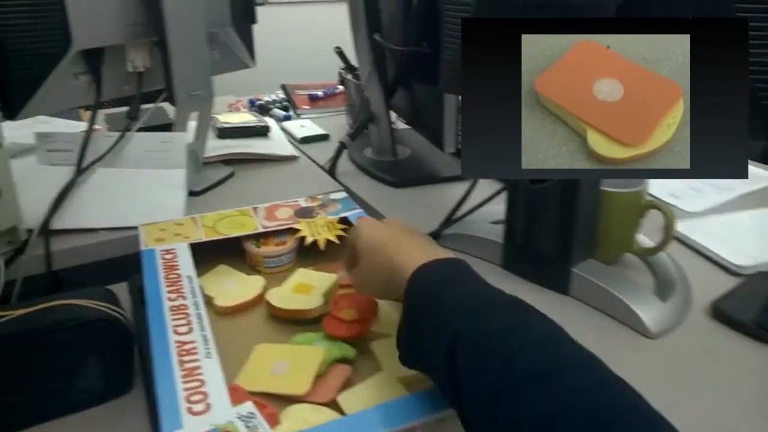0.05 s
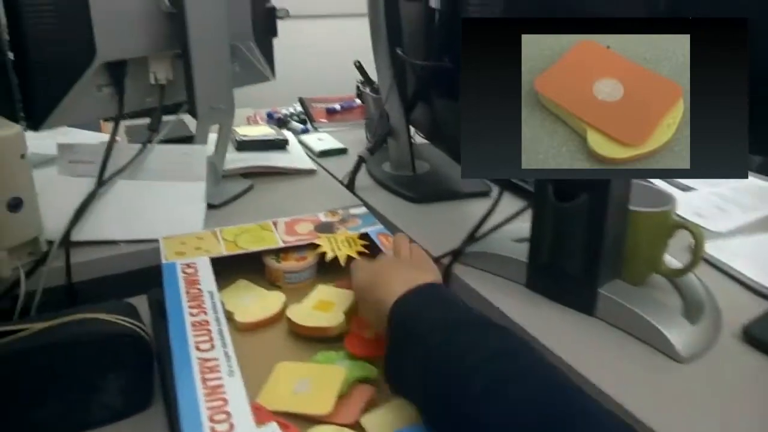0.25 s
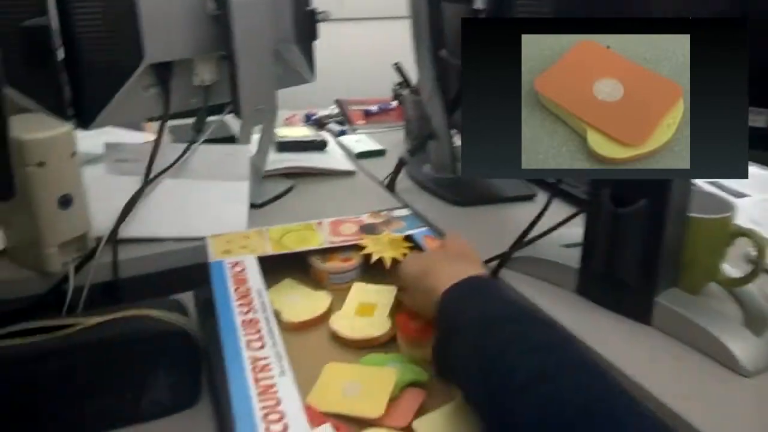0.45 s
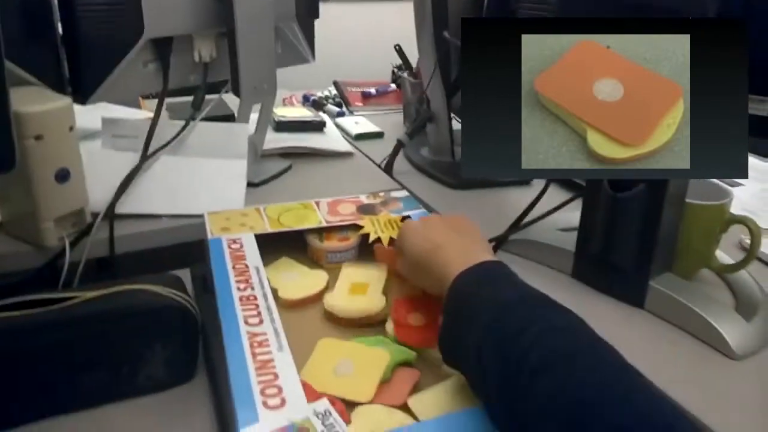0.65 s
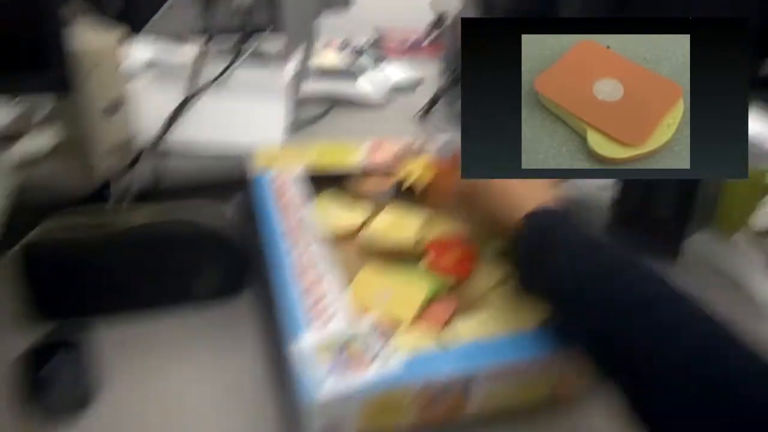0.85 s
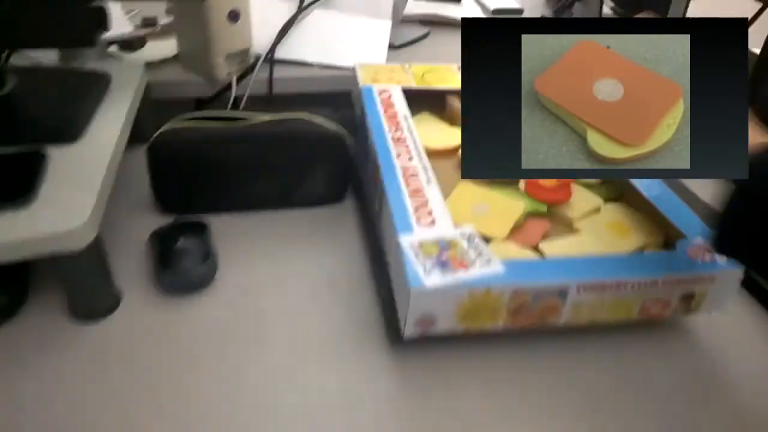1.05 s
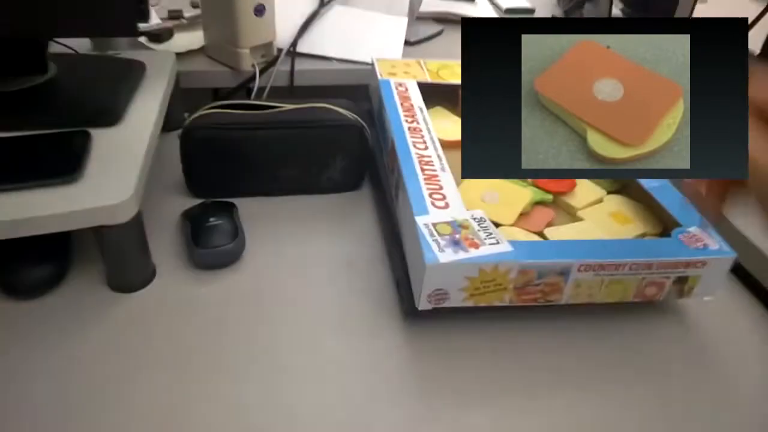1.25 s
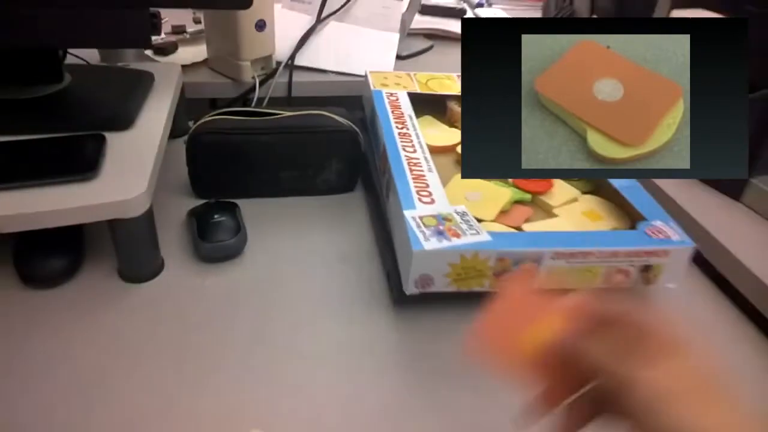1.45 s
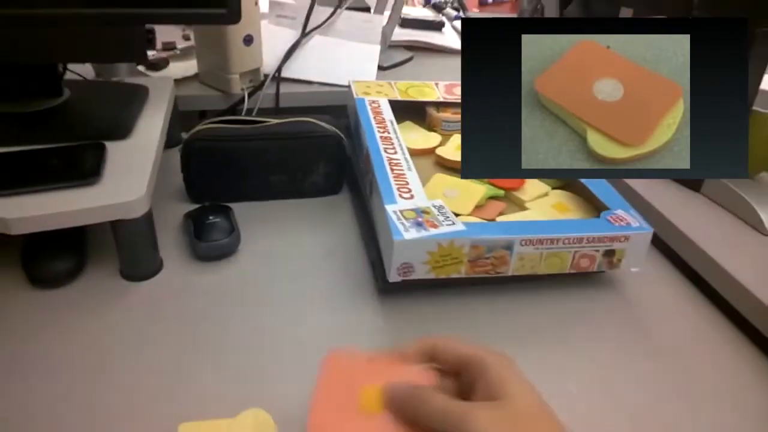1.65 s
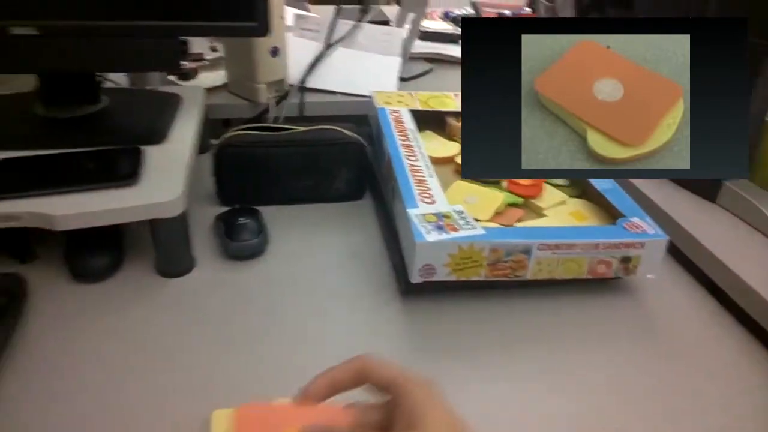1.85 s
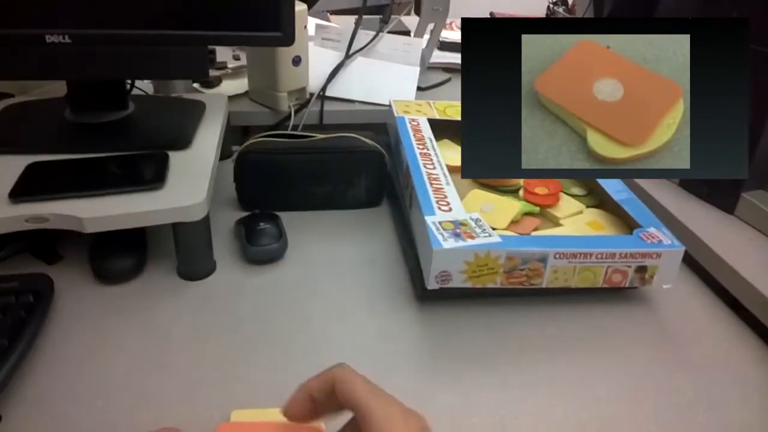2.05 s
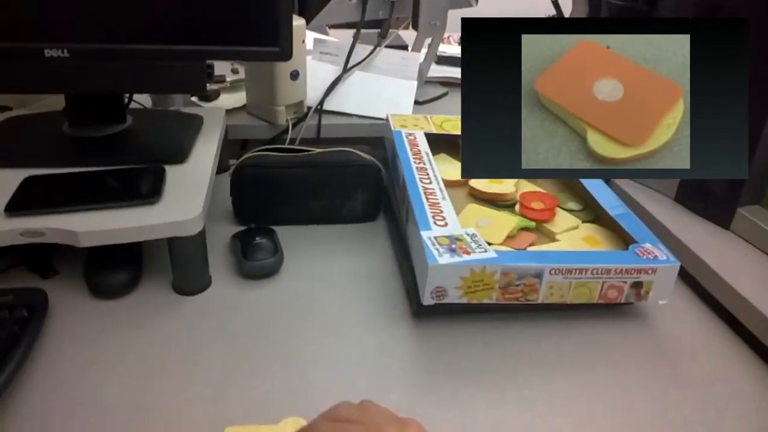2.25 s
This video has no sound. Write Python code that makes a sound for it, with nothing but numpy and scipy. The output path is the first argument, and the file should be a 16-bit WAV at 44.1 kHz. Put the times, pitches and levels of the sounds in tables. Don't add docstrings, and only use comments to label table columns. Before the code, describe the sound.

A short, bright rattle of plastic toy pieces being rummaged in a box, then near quiet

```python
import sys
import numpy as np
from scipy import signal
from scipy.io import wavfile
from scipy.ndimage import uniform_filter1d

SR = 44100
rng = np.random.default_rng(int(sys.argv[2]) if len(sys.argv) > 2 else 0)


def volts_from_decibels(level):
    exponent = np.asarray(level, float) / 20
    return 10 ** exponent


def unload_wav(signal):
    wavfile.write(
        sys.argv[1],
        SR,
        np.round(np.clip(np.atleast_2d(signal).T, -1, 1) * 32767).astype(np.int16),
    )


N = 101429

# frequency in Hz, level in dB, time to fade by 60 dB in seconds.
LARGE_PIECE = [(1075, 4, 0.088), (1173, -2.5, 0.074), (1190, -11, 0.088), (1195, -1, 0.06),
               (1275, -7.5, 0.052), (1390, -10, 0.084), (1660, -16, 0.024), (1820, -11, 0.03),
               (1904, -17, 0.051), (2223.5, -7, 0.065), (2316, -16.5, 0.035), (2450, -13, 0.035),
               (2715, -16.5, 0.04), (3000, -22.5, .02)]
# frequency in Hz, level in dB, time to fade by 60 dB in seconds.
SMALL_PIECE = [(999, -9.5, 0.018), (1058, 1.5, 0.084), (1240, -3.5, 0.034), (1375, 9.5, 0.009),
               (1578.5, 3, 0.017), (2040, -1, 0.034), (2230, -19.5, 0.026), (2470, -19.5, .025)]


def evened(x):
    return x / np.sqrt(np.mean(x ** 2) + 1e-20)


def low(x, hz, order=2):
    return signal.sosfilt(signal.butter(order, hz, fs=SR, output="sos"), x)


def add(mix, s, sound):
    part = mix[round(s * SR):][:len(sound)]
    part += sound[:len(part)]


def contacts(length, size=1500):
    u = np.arange(size) / SR / max(length, .0005)
    grit_db = 4.5
    grit = rng.standard_normal(size) * volts_from_decibels(grit_db * rng.standard_normal(size))
    rise = np.minimum(u / 0.079, 1)
    return grit * rise * np.exp(-2 * u ** 2)


def ring(modes, from_hz, size=5000):
    spread_db, detune, longest_t60 = 4, 0.011, .055
    t = np.arange(size) / SR
    hz, db, t60 = np.transpose(modes)[:, :, None]
    weight, tune = rng.standard_normal((2, len(modes), 1))
    fading_db = db + spread_db * weight - 60 * t / np.clip(t60, .001, longest_t60)
    tones = volts_from_decibels(fading_db) * np.sin(2 * np.pi * hz * (1 + detune * tune) * t)
    bass_cut = signal.butter(4, from_hz, "high", fs=SR, output="sos")
    return signal.sosfilt(bass_cut, tones.sum(0))


def as_modes(peaks):
    return [(hz, db + 20 * np.log10(width / 500), 1.8 / width) for hz, width, db in peaks]


def bodies(piece, spot_hz=4300, top_hz=12500):
    # frequency in Hz, width in Hz, level in dB.
    crack_peaks = [(4000, 150, -10), (4250, 110, 0.5), (4767, 180, -5.5), (5100, 260, -4), (5710, 1300, -2),
                   (6590, 300, -2.5), (7220, 350, -1.5), (7910, 250, -5), (8290, 280, -6.5),
                   (9230, 540, -5), (10190, 260, -7.5), (11600, 700, -19.5), (12700, 900, -21),
                   (14000, 900, -27)]
    # frequency in Hz, width in Hz, level in dB.
    box_peaks = [(410, 230, 1), (587, 100, 3.5), (675, 220, 7), (720, 150, -2)]
    bright_spot = (spot_hz, 260, 6.5)  # Hz, width Hz, dB
    piece_ring = low(ring(piece, 1220), 2780)
    crack = low(ring(as_modes([*crack_peaks, bright_spot]), 3700), top_hz)
    box = low(ring(as_modes(box_peaks), 330), 2780)
    return piece_ring, crack, box


def peaked(drive, body, db):
    out = signal.fftconvolve(drive, body)
    loudest = uniform_filter1d(out ** 2, size=88).max()
    return volts_from_decibels(db) * out / np.sqrt(2 * loudest)


def knock(piece, s, db, crack_db, spot_hz, length):
    drive = contacts(length)
    top_hz = max(12500 + 294.5 * (db + 11.5), 2.1 * spot_hz)
    levels = (db, crack_db, db - 19)
    parts = zip(bodies(piece, spot_hz, top_hz), levels)
    return s, sum(peaked(drive, body, level_db) for body, level_db in parts)


def add_knocks(toys):
    # start in seconds, ring level in dB, crack level in dB,
    # brightest crack frequency in Hz, contact length in seconds.
    first_knocks = [(0.2244, -32, -42, 4400, 0.0037), (0.2401, -25.5, -40.5, 4250, 0.0032),
                    (0.272, -35.5, -48, 6300, 0.0075), (0.287, -29.5, -34.5, 4200, 0.0044),
                    (0.306, -29, -66, 4140, 0.017), (0.3182, -21, -29.5, 4700, 0.0052),
                    (.321, -23.5, -40.5, 4440, 0.0066), (0.332, -23, -63, 4300, 0.011),
                    (0.471, -34.5, -46.5, 5530, 0.011), (0.928, -48.5, -65, 4300, .008),
                    (1.065, -61, -73, 4300, .008), (0.751, -36.5, -83, 4400, .006),
                    (0.773, -41, -61, 4450, 0.017)]
    small_knocks = [
        (0.358, -21, -34.5, 8000, 0.0063),
        (0.361, -25.5, -34, 4200, 0.01),
        (0.386, -26.5, -43, 4286, 0.0076),
        (0.404, -33, -74, 4300, .011),
        (0.423, -41.5, -60, 8000, .003),
        (.436, -33.5, -37.5, 5270, 0.0077),
        (0.44, -35, -38.5, 8170, 0.0049),
        (0.53, -17, -26.5, 4353, 0.01),
        (.566, -21, -27.5, 8000, 0.0095),
        (0.76, -46, -73, 4450, .004),
    ]
    hard_knocks = [(0.5045, -25, -29.5, 4900, 0.0034), (0.515, -17.5, -19, 7500, .006),
                   (0.546, -17.5, -34, 8200, 0.0068), (0.552, -16, -31, 8200, .005),
                   (0.5868, -15.5, -17, 7583, .006), (0.592, -11, -17.5, 4327, .007),
                   (.6085, -11, -18, 4545, .004), (.616, -18, -23, 7800, .005),
                   (.630, -15.5, -21.5, 5200, .006), (0.644, -17, -36.5, 5500, .005),
                   (0.659, -21.5, -39.5, 5000, .004), (0.66, -24, -26, 5000, .004),
                   (0.6643, -13.5, -14, 5100, 0.005), (0.6747, -14.5, -16.5, 5247, 0.0065),
                   (.703, -21, -44, 4300, .006), (0.708, -22, -38.5, 4262, .005),
                   (0.711, -23.5, -38.5, 4500, .005), (0.717, -16, -38, 4713, 0.005),
                   (0.7254, -33, -58, 4400, .003), (0.485, -45, -60, 5000, .003),
                   (0.048, -65, -89, 4300, .006)]
    for piece, rows in ((LARGE_PIECE, first_knocks), (SMALL_PIECE, small_knocks), (LARGE_PIECE, hard_knocks)):
        for row in rows:
            add(toys, *knock(piece, *row))


def ping(s, db, hz, t60):
    t = np.arange(5000) / SR
    swell = 1 - np.exp(-(t / .002) ** 2)
    return s, volts_from_decibels(db - 60 * t / t60) * swell * np.sin(2 * np.pi * hz * t)


def add_pings(toys):
    # start in seconds, peak level in dB, frequency in Hz, time to fade by 60 dB in seconds.
    pings = [(0.2255, -25, 1096, 0.045), (.227, -55, 2290, .04), (0.2382, -15.5, 4320, 0.017),
             (.240, -23.5, 4790, 0.018), (0.238, -37, 1139, 0.056), (.240, -22, 2160, 0.032),
             (.275, -41, 6600, .025), (.288, -33, 4350, .025), (.308, -36, 4100, .03),
             (.319, -24.5, 5130, .015), (0.32, -31, 4320, .07), (.321, -27, 2230, .06),
             (0.3207, -15, 1168, 0.026), (0.33, -25, 1100, 0.052), (0.357, -17, 1450, 0.035),
             (.364, -26.5, 590, 0.075), (.387, -35.5, 4300, .03), (.408, -32.5, 618, .07),
             (0.412, -35, 1557, .04), (0.438, -31.5, 1615, .04), (0.4741, -30.5, 1098, 0.058),
             (.473, -38.5, 2230, .04), (0.507, -27.5, 1036, .04), (.515, -19, 2283, .04),
             (.516, -20, 1068, 0.053), (0.517, -19.5, 1453, .05), (0.517, -24.5, 7300, .02),
             (0.534, -24.5, 1830, .04), (0.547, -34, 8250, .05), (0.551, -23.5, 1566, .05),
             (.549, -21, 1090, 0.045), (.588, -15.5, 2214, 0.062), (.595, -17.5, 1064, .05),
             (.591, -23, 4273, .07), (0.611, -17, 1100, .04), (.611, -26.5, 2710, .09),
             (.612, -25.5, 7730, .05), (0.632, -30, 5100, .02), (.665, -17, 4940, .025),
             (.666, -19, 2230, .06), (.666, -26, 730, .05), (.675, -21.5, 9600, .02),
             (.675, -22.5, 2250, .04), (0.701, -32, 4340, .03), (.714, -24.5, 2230, .06),
             (0.706, -28, 1126, .04), (.929, -49, 1227, .07)]
    for row in pings:
        add(toys, *ping(*row))


def add_thump(toys):
    t = np.arange(2000) / SR
    add(toys, .608, volts_from_decibels(-31.5 - 60 * t / .05) * np.sin(2 * np.pi * 118 * t))


def stir():
    # time in seconds, stirring level in dB.
    passes = [
        [(0.224, -56), (0.244, -37.5), (0.256, -62), (0.316, -48), (0.384, -50.5), (0.422, -65), (0.438, -53),
         (0.498, -78.5)],
        [(0.504, -42.5), (0.518, -30.5), (0.522, -35.5), (0.574, -31.5), (0.58, -44), (0.59, -28),
         (0.63, -28.5), (0.655, -51)],
        [(0.657, -41.5), (0.665, -29.5), (0.679, -27.5), (0.689, -41.5), (0.726, -41.5), (0.745, -78),
         (0.787, -72), (0.8, -94.5)],
    ]
    hits_per_s, grain_db, slide_db = 2500, 4, -6.5
    ring_db, crack_db, box_db = 1.5, -9, -4
    t = np.arange(N) / SR
    effort = sum(volts_from_decibels(np.interp(t, *np.transpose(rows), left=-150, right=-150)) for rows in passes)

    happens = rng.random(N) < hits_per_s / SR
    strength = volts_from_decibels(grain_db * np.minimum(rng.exponential(1, N), 4))
    hits = evened(happens * rng.choice([-1., 1.], N) * strength)

    spot, out = rng.integers(0, 8, N), np.zeros(N)
    for k in range(8):
        parts = zip(bodies([LARGE_PIECE, SMALL_PIECE][k % 2]), (ring_db, crack_db, box_db))
        body = sum(volts_from_decibels(level_db) * b / np.linalg.norm(b) for b, level_db in parts)
        out += signal.oaconvolve(hits * effort * (spot == k), body)[:N]

    edge_body = bodies(LARGE_PIECE, 6000, 12435)[1]
    edge = signal.oaconvolve(rng.standard_normal(N), edge_body)[:N]
    return low(out, 8000, order=1) + volts_from_decibels(slide_db) * effort * evened(edge)


def rub(start, length, lo_hz, hi_hz, db):
    patches = evened(uniform_filter1d(rng.standard_normal(9000), size=150))
    grit = rng.standard_normal(9000) * volts_from_decibels(2.0 * patches)
    band = signal.butter(2, [lo_hz, hi_hz], "band", fs=SR, output="sos")
    hiss = signal.sosfilt(band, grit)[-round(length * SR):]
    swell = np.sin(np.pi * np.linspace(0, 1, len(hiss)) ** .5)
    return start, volts_from_decibels(db) * evened(hiss) * swell


def add_rubs(toys):
    # start in seconds, length in seconds, lowest frequency in Hz, highest frequency in Hz.
    rubs = [(1.9, .06, 6000, 14000), (.165, .2, 700, 3500), (2.288, .03, 200, 4000), (.04, .07, 300, 1900),
            (.9125, .010, 1700, 3800), (.36, .075, 470, 720), (.001, .03, 950, 1200), (.72, .11, 300, 1000),
            (.655, .08, 100, 400), (.28, .03, 330, 480), (1.12, .05, 1100, 1350), (.0388, .009, 400, 2500),
            (.92, .14, 400, 2200), (.15, .2, 4500, 12000)]
    rub_db = [-74, -67, -78, -66.5, -53, -41, -73, -56.5, -46, -45.5, -81, -63.5, -67.5, -76]
    for row, db in zip(rubs, rub_db):
        add(toys, *rub(*row, db))


def tick(s, db, length, from_hz):
    thin = signal.firwin(31, from_hz, pass_zero=False, fs=SR)
    return s, peaked(contacts(length), thin, db)


def add_ticks(toys):
    # start in seconds, peak level in dB, length in seconds, lowest frequency in Hz.
    ticks = [
        (0.917, -63, 0.0018, 1500),
        (0.971, -61, 0.0027, 5000),
        (1.32, -48.5, 0.0062, 3180),
        (1.324, -68, .003, 4510),
        (1.907, -72, 0.0023, 4000),
        (2.215, -60, 0.0039, 4480),
    ]
    for row in ticks:
        add(toys, *tick(*row))


def desk(x):
    notch_hz, width_hz, depth = 3380, 520, .65
    band = signal.lfilter(*signal.iirpeak(notch_hz, notch_hz / width_hz, fs=SR), x)
    return x - depth * band


def office(x):
    room_db, room_t60, dull_hz = -19, .11, 3500
    taps = np.zeros(SR // 2)
    at = np.arange(100, len(taps) - 20, 20)
    taps[at + rng.integers(0, 20, len(at))] = rng.choice([-1., 1.], len(at))
    fading = taps * volts_from_decibels(-60 * np.arange(len(taps)) / SR / room_t60)
    tail = signal.lfilter(*signal.butter(1, dull_hz, fs=SR), fading)
    return volts_from_decibels(room_db) * signal.fftconvolve(x, tail / np.linalg.norm(tail))[:N]


def air():
    # frequency in Hz, level in dB per Hz.
    colour = [(8, -2), (26, -23), (42, -19), (236, -23), (555, -44), (900, -48.5), (4000, -57),
              (14500, -61)]
    air_db, patch_db = -51.5, 0.17
    frames, hz = N // 512 + 5, np.fft.rfftfreq(2048, 1 / SR)
    a, b, patches = rng.standard_normal((frames, 1025, 3)).T
    patches = uniform_filter1d(patches, size=8, axis=0)
    patches = evened(uniform_filter1d(patches, size=8, axis=1))
    f, db = np.transpose(colour)
    shape = np.interp(np.log(hz + 1), np.log(f + 1), db)[:, None]
    spectrum = (a + 1j * b) * volts_from_decibels(shape + patch_db * patches)
    noise = signal.istft(spectrum, nperseg=2048, noverlap=1536)[1][:N]
    return volts_from_decibels(air_db) * evened(noise)


def scene():
    toys = np.zeros(N)
    add_knocks(toys)
    add_pings(toys)
    add_thump(toys)
    add_rubs(toys)
    add_ticks(toys)
    toys = desk(toys + stir())
    return np.array([toys + office(toys) + air()])


def roll_off(x):
    return signal.sosfilt(signal.butter(12, 15540, fs=SR, output="sos"), x)


def record(dry):
    duck_from_db, duck_share, recover_db_per_s = -34, 0.11, 37.5
    power_db = 10 * np.log10(abs(uniform_filter1d((dry ** 2).mean(0), size=2000)) + 1e-12)
    fall = np.arange(N) * recover_db_per_s / SR
    held_db = np.maximum.accumulate(power_db + fall) - fall
    over_db = np.maximum(held_db - duck_from_db, 0)
    ducked = dry / volts_from_decibels(duck_share * uniform_filter1d(over_db, size=1000))
    treble_cut = signal.firwin(71, 14050, window=("kaiser", 7), fs=SR)
    cut = signal.oaconvolve(ducked, treble_cut[None], "same")
    return roll_off(cut - .0071)


dry = scene()
out = record(dry)
unload_wav(out)
```